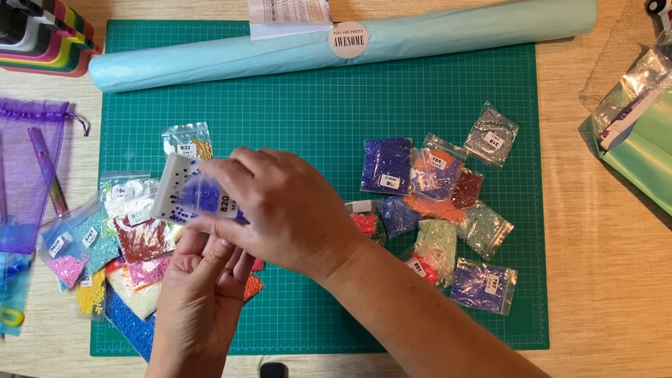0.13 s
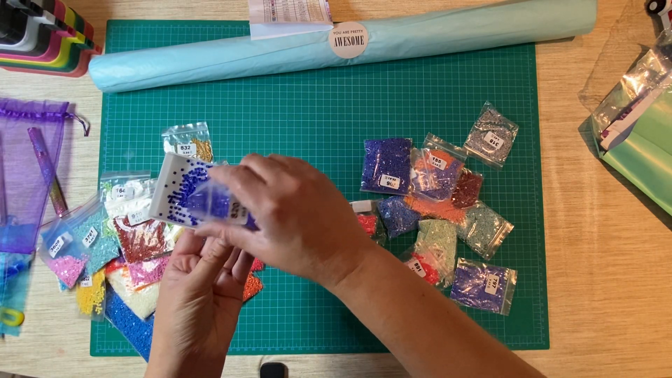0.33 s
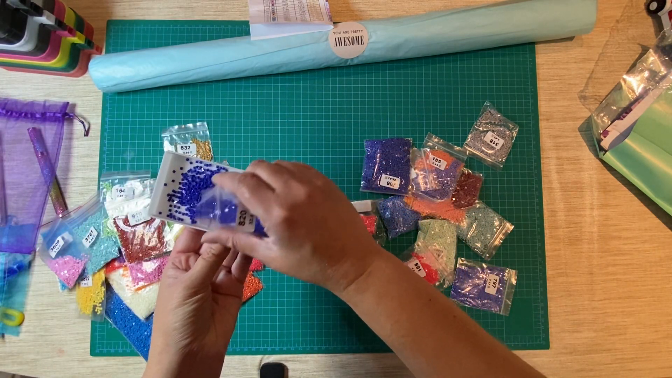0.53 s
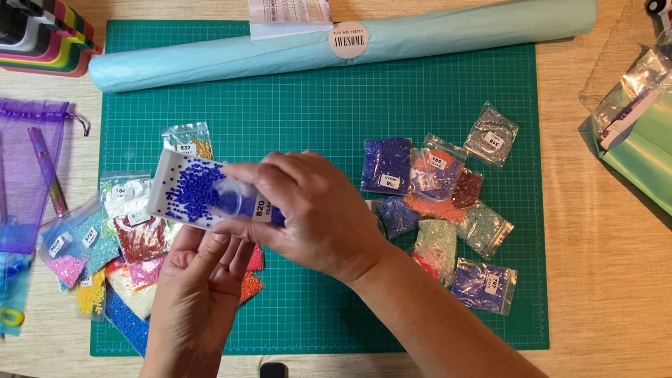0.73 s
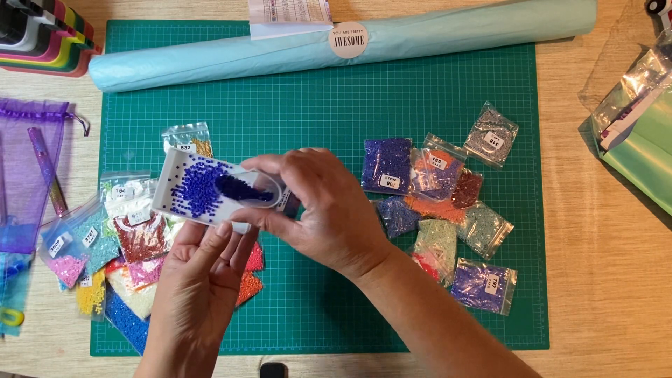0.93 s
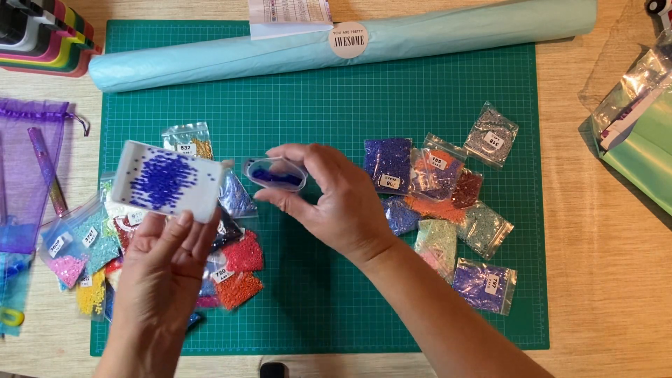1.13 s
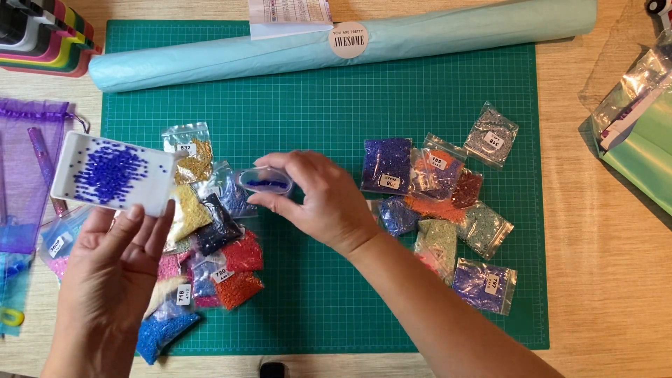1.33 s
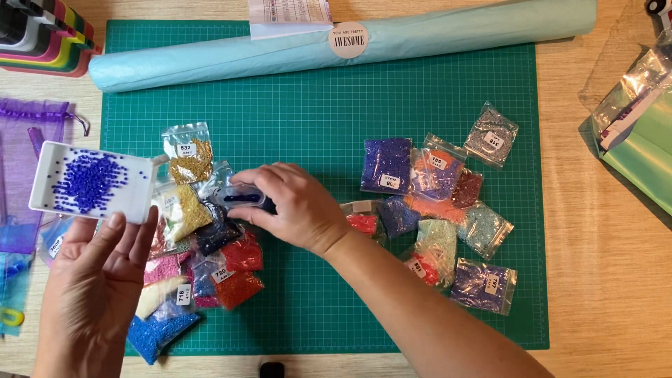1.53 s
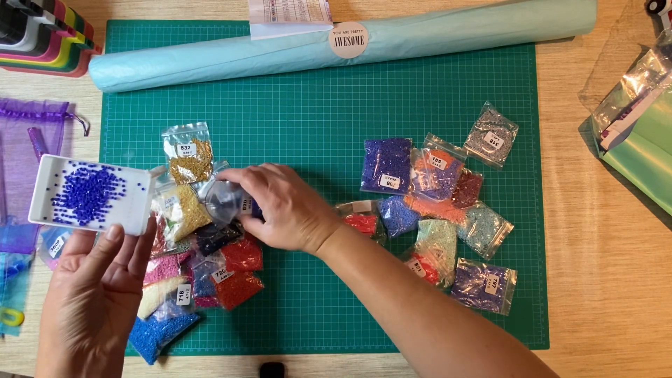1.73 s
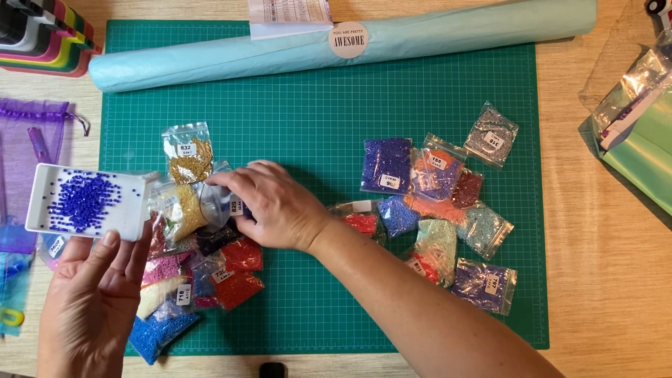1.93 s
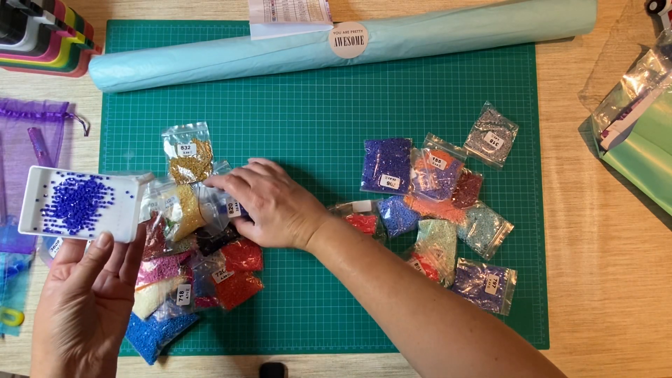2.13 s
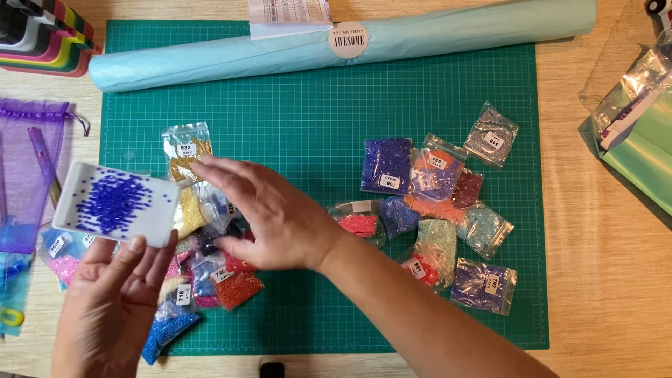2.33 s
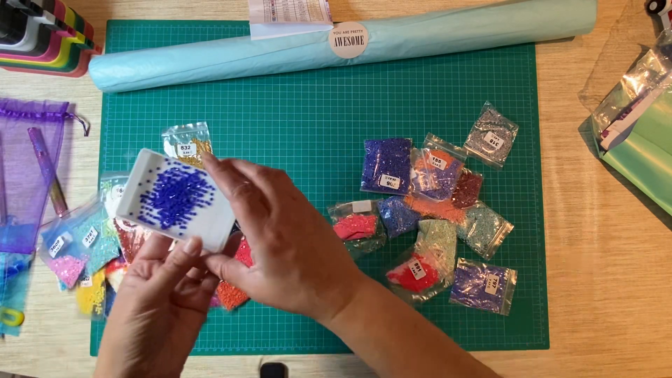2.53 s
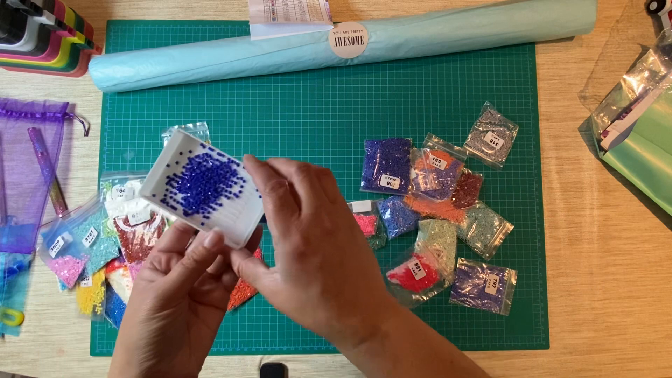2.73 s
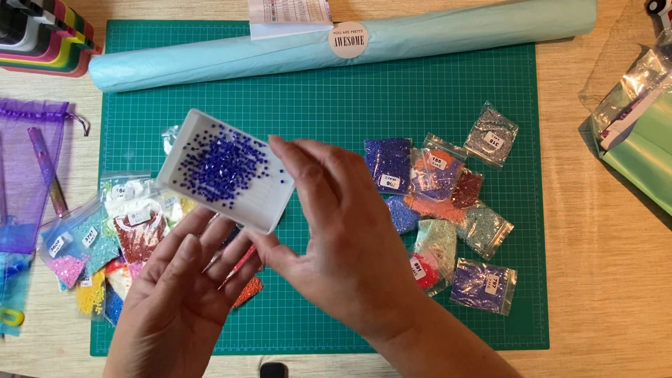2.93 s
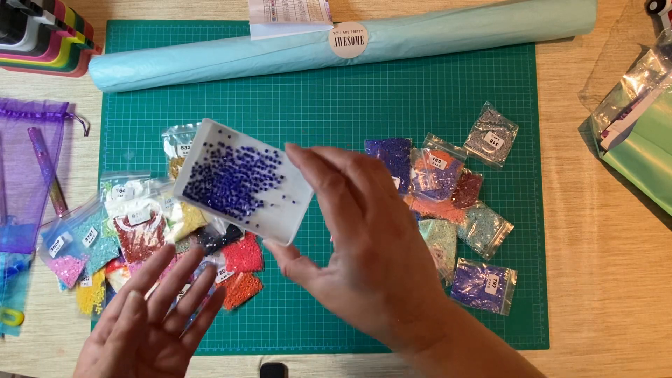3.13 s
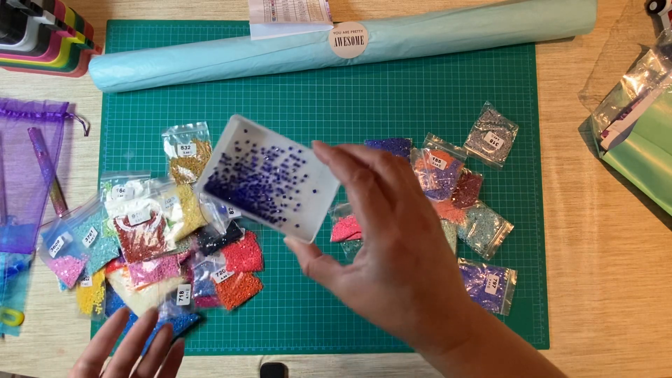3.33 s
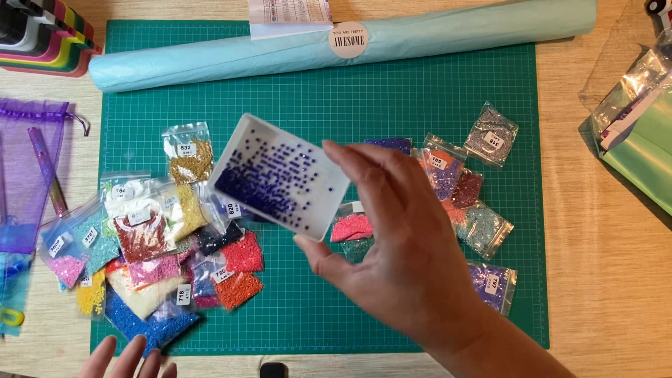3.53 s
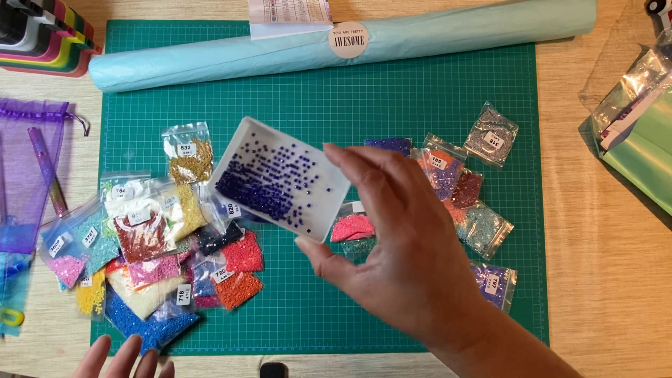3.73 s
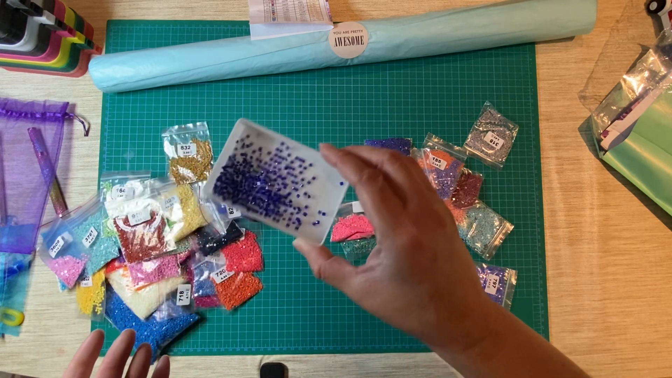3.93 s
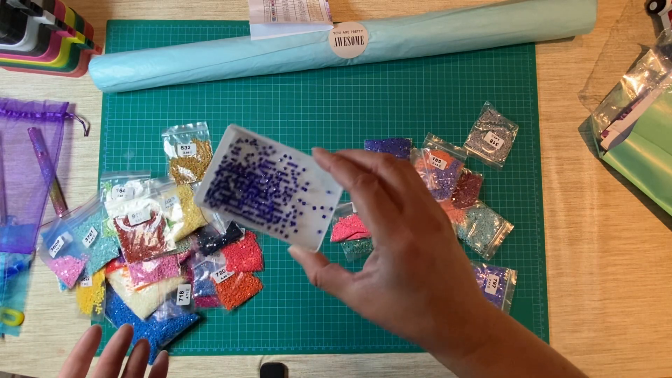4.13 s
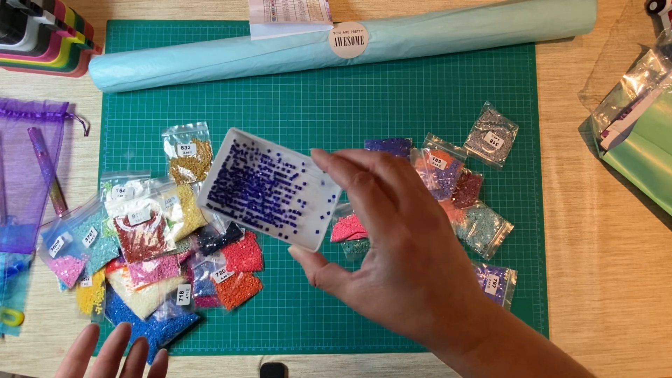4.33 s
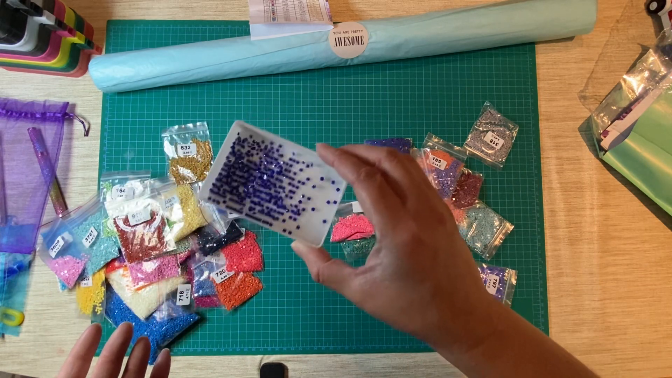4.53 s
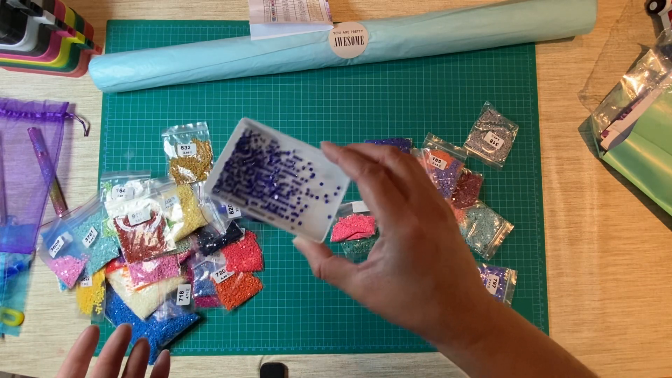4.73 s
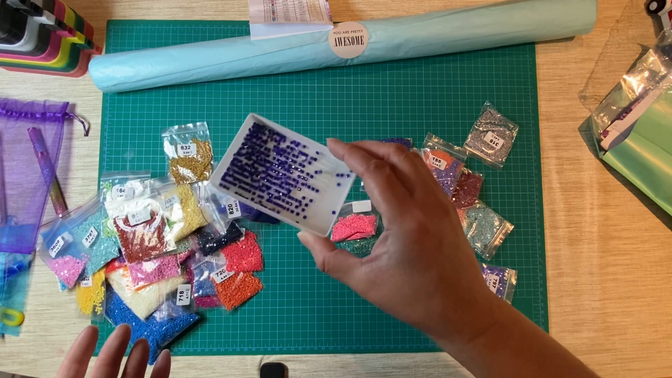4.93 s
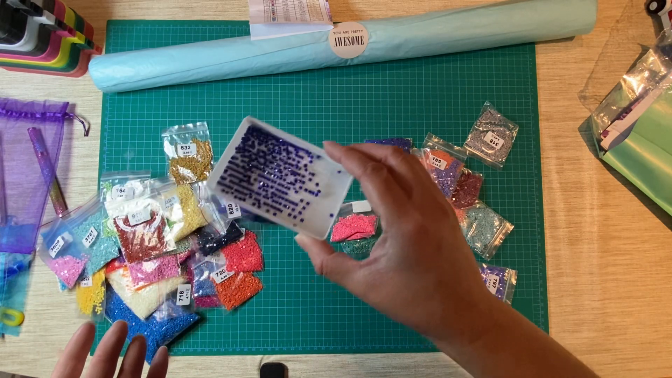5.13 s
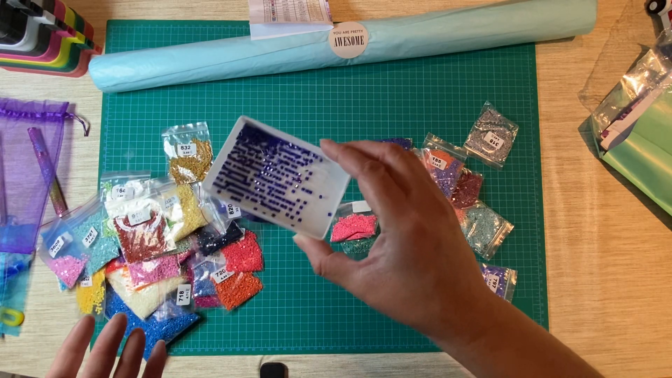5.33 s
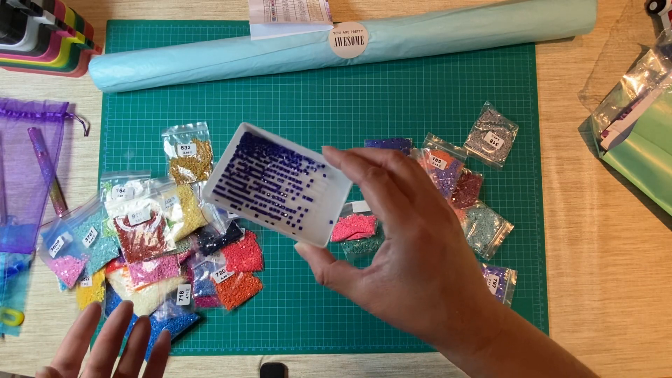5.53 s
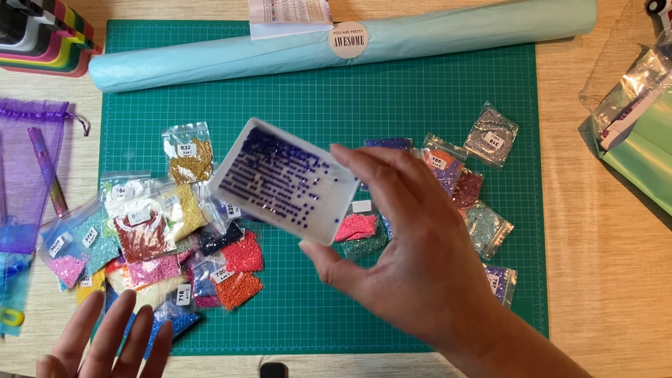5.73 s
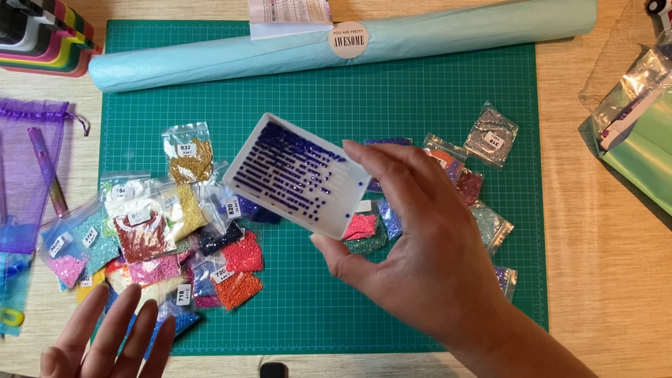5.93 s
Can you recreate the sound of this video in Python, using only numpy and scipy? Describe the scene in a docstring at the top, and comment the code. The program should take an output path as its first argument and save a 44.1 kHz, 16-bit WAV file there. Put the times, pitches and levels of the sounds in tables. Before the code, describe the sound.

Heard in close stereo above a table in a quiet room with low noise and a faint wavering hum. At 0 s a soft hollow knock rings out on the right as tiny resin beads already pour from a pot into a ridged plastic tray, a bright, clumpy patter. A surge comes at 0.4 s; scrapes, clicks and dry plastic taps cluster around 0.5 and 0.85-1.15 s while the trickle thins, leaving stray beads by 1.3 s. From 1.45 to 1.8 s the pot presses onto little plastic bags: crisp crinkles, rubbing and taps, faint until 2.1 s. Near quiet follows, with slight finger scuffs at 2.6-2.75 s. From 2.8 s the tray is jiggled: beads hiss and rattle in uneven jolts, strongly at 3.05 s, densest around 4-5.2 s with hard little ticks and plastic ringing, then thinner and softer until 6.1 s.

```python
"""A quiet room with low noise and a wavering hum; a hollow knock, then tiny resin beads are tipped from a pot
into a ridged plastic tray: clumped noise grains through resonances of pot and tray, with ringing modes.
The pot is set down on little plastic bags, which crinkle and rub in swells of grains; then fingers scuff the tray.
Last the tray is jiggled, so the beads hiss and rattle along its grooves, while the hum sinks for a moment.
Clicks are bursts of noise, bumps are decaying sines; all is heard in stereo from close above the table."""
import sys
import numpy as np
from scipy import signal
from scipy.fft import rfft, irfft, next_fast_len
from scipy.io import wavfile
from scipy.ndimage import uniform_filter1d

SR = 44100
rng = np.random.default_rng(int(sys.argv[2]) if len(sys.argv) > 2 else 0)


def generate_wav(sig):
    """Save sig (samples, or channels by samples) to the path in sys.argv[1] as 16-bit PCM at SR."""
    pcm = np.round(np.clip(np.atleast_2d(sig).T, -1, 1) * 32767).astype(np.int16)
    wavfile.write(sys.argv[1], SR, pcm)


N = 268260
SIZE = next_fast_len(N + SR // 2)   # leaves space for tails
HZ = np.maximum(np.arange(SIZE // 2 + 1) * SR / SIZE, 1)
TIME = np.arange(N) / SR

# Levels in the tables are relative: the layers trim them and the stereo image shades them.
# room noise colour: (frequency [Hz], level [dB per Hz])
ROOM = [(15, -44), (27, -16), (38, 1.5), (50, 12), (75, -1), (110, 4.5), (180, -0.5), (390, 0.5),
        (560, -10), (800, -12), (1200, -19.5), (3500, -30.5), (9000, -31.5), (15000, -52)]
# room hum: (frequency [Hz], rms level [dB])
HUM = [(47.5, -75.5), (66.1, -66), (199.2, -78), (506, -88), (597, -88)]
# the hum sinks for a moment: (time [s], level [dB])
HUM_LEVEL = [(0, 1), (3.2, 0), (3.33, -6), (4.1, -2.5), (4.5, -1), (6.09, 1.5)]
# stereo image by frequency: (frequency [Hz], left lead [rad], likeness [0-1], left minus right [dB])
STEREO = [(100, 0, .9, -.5), (350, -.1, .6, -2.6), (750, -.5, .35, -1.3), (1300, .1, .9, -2),
          (2000, .2, .93, -1), (2700, .9, .75, -3.3), (3400, .4, .78, -1.1), (4700, 1.4, .48, -4.2),
          (5800, 1.5, .6, -1), (6250, 1.9, .7, 0), (6650, 2.9, .97, 0), (7000, 3.1, .99, 0),
          (7650, 3.25, .99, 0), (8450, 4.4, .72, 0), (10000, 6.2, .97, 0), (11500, 6.5, .85, 0),
          (12350, 8, .8, 0), (12700, 9.3, .99, 0), (14200, 9.5, .995, 0), (15300, 11.8, .7, 0)]
# a hollow knock ringing out: (frequency [Hz], level [dB], t60 [s])
KNOCK = [(361, -38, 0.18), (440, -35, 0.092)]
# bumps of pot and fingers that set the plastic ringing: (time [s], level [dB], pitch [Hz], t60 [s])
BUMPS = [(0.167, -51, 119, 0.18), (.488, -35, 3330, 0.01), (0.54, -29.5, 880, 0.012),
         (0.5389, -33.5, 3420, 0.0092), (.8468, -37, 2260, 0.013), (0.848, -40, 339, 0.055),
         (.862, -43, 300, 0.041), (.867, -41, 1070, 0.018), (0.884, -37.5, 1110, 0.0079),
         (.909, -38, 910, 0.014), (0.941, -37, 1040, 0.017), (1.1335, -44, 950, .016),
         (1.14, -39, 900, 0.011), (1.446, -37.5, 5200, 0.0055), (1.6412, -39, 1400, .009),
         (1.6466, -37, 1230, 0.009), (1.6526, -39, 1300, .007), (1.657, -32.5, 1450, 0.013),
         (1.768, -44, 1750, 0.011), (1.802, -48.5, 506, 0.032), (2.813, -47, 58.7, 0.13),
         (2.816, -57, 2280, .04), (2.872, -42, 84.6, 0.052), (4.544, -49, 69.4, 0.44),
         (4.574, -50.5, 145, 0.15)]
# neighbours of a bump's main mode: (pitch [ratio], level [dB], t60 [share of the main t60])
BUMP_NEIGHBOURS = [(.68, -8.5, 0.44), (1.45, -9.5, 0.68)]
# clicks of pot, tray and snapping film: (time [s], low band [dB], middle band [dB], high band [dB])
TICKS = [(.3825, -51.5, -59, -53), (0.4881, -58, -44.5, -50), (.5402, -47, -60, -55),
         (0.6265, -58, -51.5, -52), (.711, -70, -68, -53), (0.787, -60.5, -59, -50),
         (0.837, -72, -50.5, -65), (.8467, -49, -45, -48.5), (.941, -51, -46.5, -45.5),
         (0.9633, -58, -56, -72), (1.0382, -48.5, -52, -50), (1.120, -55, -68, -42.5),
         (1.4445, -68, -54.5, -51), (1.503, -54.5, -57, -70), (1.513, -60, -52, -65),
         (1.526, -60, -53, -54), (1.5354, -50.5, -51, -52), (1.5507, -62, -51, -41), (1.561, -62, -53, -57),
         (1.574, -60, -63, -67), (1.669, -50.5, -48.5, -38), (1.683, -59, -62, -61),
         (1.7235, -60, -58, -60), (1.73, -57, -64, -66), (1.7394, -52, -56, -67), (1.766, -55, -61, -64),
         (1.8, -59, -56, -60), (1.852, -62, -70, -78), (1.9362, -70, -64.5, -67), (5.644, -66, -58, -43)]
# bands of a click: (low edge [Hz], high edge [Hz], t60 [s])
TICK_BANDS = [(500, 1800, .014), (1800, 6000, .006), (6000, 12500, .005)]
# faint after-ring of a click: (level [dB], t60 [s])
AFTER_RING = (-24, .05)
# modes that ring on when the pot clicks: (frequency [Hz], t60 [s], level [dB])
POT_RINGS = [(2110, 0.038, -7.5), (2530, .025, -5.5), (3300, 0.047, -7), (5550, 0.021, 6)]
# modes that ring on when one bead strikes the tray: (frequency [Hz], t60 [s], level [dB])
TRAY_RINGS = [(1306, 0.019, -14), (1997, 0.022, -9), (2133, 0.02, -7.5), (2275, 0.026, -4),
              (2740, 0.038, -11.5), (3246, 0.02, -5), (3663, 0.028, -11.5), (4860, 0.022, -8),
              (5700, 0.013, -4.5), (7300, .012, -31), (10400, 0.0062, -1)]
# single beads that land hard in the tray: (time [s], knock [dB], tick [dB])
LANDINGS = [(.041, -60, -39), (.123, -49, -48), (.132, -52, -43), (0.161, -55, -41), (.216, -53, -39.5),
            (.325, -56, -42), (.39, -56, -45), (.428, -50, -59), (0.497, -47, -53), (0.562, -52, -48),
            (.592, -56, -59), (0.604, -61, -52), (0.657, -63, -45), (.755, -55, -66), (.928, -57, -53),
            (1.045, -47, -50), (1.131, -47, -59), (1.25, -57, -71), (1.304, -63, -71), (1.322, -59, -69.5),
            (2.829, -53, -68), (2.862, -49, -45), (2.889, -58, -38), (3.055, -45.5, -35), (3.065, -44, -43),
            (3.203, -46, -53), (3.406, -41, -47), (3.514, -49, -47), (3.541, -49, -47), (3.553, -50, -47),
            (3.586, -46, -46), (3.626, -47, -52), (3.761, -55, -47), (3.801, -48, -49), (3.892, -43, -45),
            (3.937, -47, -51), (4.074, -44.5, -45), (4.165, -43, -38), (4.233, -43, -37), (4.284, -46, -37),
            (4.296, -56, -40), (4.32, -41, -47), (4.35, -42, -42), (4.463, -45, -48), (4.5, -48, -36),
            (4.662, -39, -44), (4.752, -48, -40), (4.8, -39.5, -45), (4.864, -53, -35), (4.943, -44, -46),
            (5.006, -41.5, -42), (5.043, -45, -40), (5.069, -46, -37), (5.124, -46, -36), (5.133, -52, -39),
            (5.156, -48, -46), (5.16, -41, -49), (5.192, -46, -39), (5.292, -45, -48), (5.449, -47, -50),
            (5.474, -48, -42), (5.727, -56, -40), (5.774, -60, -42), (5.785, -49, -46), (5.814, -53, -38),
            (5.87, -63, -41), (5.946, -55, -41), (5.993, -59, -43)]
# fingers sliding onto the tray: (peak time [s], length [s], level [dB])
SCUFF = [(2.585, 0.027, -62.5), (2.64, 0.057, -63), (2.762, 0.023, -65.5)]
# the pot scrapes the tray's rim: (peak time [s], length [s], level [dB])
SCRAPES = [(.36, 0.11, -53), (.54, 0.044, -48), (.67, 0.1, -59), (.755, 0.014, -51.5), (.865, 0.042, -45.5),
           (.945, 0.064, -45), (1.05, 0.044, -48.5), (1.135, 0.082, -49), (1.26, 0.11, -55.5)]
# the pot presses into the bags: (peak time [s], length [s], crinkle [dB], rub [dB])
PRESSES = [(1.455, 0.017, -58.5, -68), (1.515, 0.032, -55, -55.5), (1.562, 0.04, -54, -53),
           (1.65, 0.031, -53.5, -47), (1.679, 0.017, -49.5, -56), (1.735, 0.055, -56, -54.5),
           (1.795, 0.07, -63, -54), (1.9, 0.069, -73, -64), (2.03, 0.13, -75, -65.5),
           (2.125, 0.034, -67.5, -62.5)]
# jerks of the pot stir the beads inside and spill a few: (peak time [s], length [s], stirred [dB], spilled [dB])
JERKS = [(.405, 0.055, -54.5, -45.5), (.58, 0.15, -69, -70), (.865, 0.072, -57.5, -55),
         (1.035, 0.064, -54, -45.5), (1.135, .11, -52.5, -54.5), (1.3, 0.063, -68, -68)]
# steady trickle of beads out of the pot: (time [s], level [dB])
POUR = [(0, -38), (.08, -43.5), (.22, -43), (.33, -47), (.64, -49.5), (.76, -57), (.98, -57), (1.3, -73),
        (1.42, -90)]
# steady run of beads down the tilted tray: (time [s], level [dB])
SHAKE = [(2.79, -87), (2.817, -56), (2.83, -50), (3.5, -46.5), (3.82, -44.5), (4.4, -43.5), (5.22, -46.5),
         (5.41, -50.5), (5.97, -52.5), (6.08, -59)]
# jolts of the hand that throw the beads along the tray: (peak time [s], length [s], level [dB])
JOLTS = [(2.88, .06, -48.5), (2.95, 0.047, -54), (3.015, 0.056, -45), (3.056, 0.039, -40),
         (3.145, 0.07, -46), (3.208, 0.052, -42.5), (3.4, 0.063, -46.5), (3.568, 0.044, -47),
         (3.765, 0.074, -47), (3.96, 0.038, -47.5), (4.285, 0.088, -48.5), (4.475, 0.058, -48),
         (4.635, 0.067, -48), (4.768, 0.031, -44), (4.82, .035, -46.5), (4.95, 0.017, -56),
         (4.992, 0.066, -48.5), (5.135, 0.064, -46.5), (5.29, 0.05, -50), (5.455, 0.039, -49),
         (5.63, 0.049, -48), (5.725, 0.041, -52), (5.785, 0.059, -50.5), (5.88, 0.017, -53),
         (5.945, 0.059, -54.5)]
# colour of rubbing on rim and bags: (frequency [Hz], level [dB per Hz])
RUB_COLOUR = [(150, -7), (350, -1), (700, -2), (1050, 0), (1500, -7), (2400, -6), (4000, -9), (12000, -37)]
# colour of crinkling film: (frequency [Hz], level [dB per Hz])
CRINKLE_COLOUR = [(300, -18), (1500, -4), (2600, 0), (3600, -5), (5600, 1), (8000, -2), (10500, -7),
                  (15500, -12)]
# colour of beads against the pot's wall: (frequency [Hz], level [dB per Hz])
SLIDE_COLOUR = [(300, -7), (1200, -5), (3500, 0), (7000, -1.5), (15500, -41)]
# colour of pouring beads and of sliding skin: (frequency [Hz], level [dB per Hz])
POT_COLOUR = [(150, 4), (400, -4.5), (900, -3.5), (1400, -3), (2000, 1.5), (2800, -4.5), (3400, -0.5),
              (4200, -2), (7000, 4), (10000, -1.5), (12500, 2.5), (15500, -2.5)]
# colour of beads in the tray: (frequency [Hz], level [dB per Hz])
TRAY_COLOUR = [(150, -20), (400, -12), (900, -13), (1120, -12.5), (1350, -7), (1850, -6), (2500, -4.5),
               (3000, -3), (4000, -2), (6000, -.5), (8000, -2), (11000, -1.5), (13400, 0), (15500, -3)]
# resonances of the pot: (frequency [Hz], width [Hz], lift [dB])
POT_MODES = [(2005, 330, 11), (2430, 170, 9.5), (3120, 630, 6), (5440, 400, 0.5)]
# resonances of the pot's lip as beads roll over it: (frequency [Hz], width [Hz], lift [dB])
LIP_MODES = [(3600, 200, 2), (5660, 260, 3), (7350, 450, 1), (9700, 630, 7.5)]
# resonances of the undamped tray: (frequency [Hz], width [Hz], lift [dB])
TRAY_MODES = [(1310, 160, 4), (1680, 120, 2), (2070, 170, 7), (2260, 190, 9), (2700, 150, 5.5),
              (3270, 220, 6.5), (4680, 200, 2), (4960, 160, 4.5), (5750, 250, 2), (7330, 450, 8),
              (9150, 800, 4), (10250, 450, 7.5), (12000, 600, 2)]

ROOM_NOISE_DB = -64.5
CEILING_S, ROOM_T60_S = 0.013, 0.072
CUTOFF_HZ = 15700
# every movement swells and dies away: share of its length spent rising, and exponent of its fall
RISE_SHARE, FALL_POWER = 0.45, 2


def from_db(db):
    """Decibels to gain."""
    return 10 ** (np.asarray(db) / 20)


def rms_one(x):
    """Scale to rms 1."""
    return x / np.sqrt(np.mean(x ** 2) + 1e-20)


def gains(rows):
    """The dB columns of a curve as gains in time, silent outside it."""
    s, *columns = np.transpose(rows)
    return [from_db(np.interp(TIME, s, c, left=-200, right=-200)) for c in columns]


def swells(moves):
    """Gains in time, one per dB column: each movement is 3 dB down at the ends of its length; powers add."""
    share, power = RISE_SHARE, 0
    coarse = TIME[::20]
    for s, length, *levels_db in moves:
        age = (coarse - s) / length
        rising = (age / share) ** 2
        falling = (np.abs(age) / (1 - share)) ** FALL_POWER
        away = np.where(age < 0, rising, falling)
        power = power + from_db(levels_db)[:, None] ** 2 * .5 ** np.minimum(away, 60)
    return [np.sqrt(np.interp(TIME, coarse, p)) for p in power]


def over_hz(rows):
    """The columns of a table, joined on a log-frequency axis."""
    hz, *columns = np.transpose(rows)
    return [np.interp(np.log(HZ), np.log(hz), c) for c in columns]


def filtered(x, response):
    """Pass x through a frequency response."""
    return irfft(rfft(x, SIZE) * response, SIZE)[..., :N]


def body(colour, modes=()):
    """Minimum-phase response of unit power: a broad colour with resonances on top."""
    db = over_hz(colour)[0]
    db = db + sum(lift / (1 + (2 * (HZ - hz) / width) ** 2) for hz, width, lift in modes)
    cepstrum = irfft(np.log(rms_one(from_db(db))), SIZE)
    # folding the cepstrum forward makes the response causal
    cepstrum[1:SIZE // 2] *= 2
    cepstrum[SIZE // 2 + 1:] = 0
    return np.exp(rfft(cepstrum, SIZE))


def drift(corner_hz):
    """Slow random wander of rms 1: noise low-passed at corner_hz."""
    return rms_one(filtered(rng.standard_normal(N), 1 / (1 + (HZ / corner_hz) ** 2)))


def contacts(per_s, spread_db, clump_db, clump_hz, contact_s):
    """Tiny clumped impacts of uneven size, as decaying noise grains with random place: rows (centre, offset)."""
    sizes = from_db(spread_db * np.minimum(rng.exponential(1, N), 4) + clump_db * drift(clump_hz))
    energy = sizes ** 2 * (rng.random(N) < per_s / SR) + 1e-9
    energy = signal.lfilter([1], [1, -np.exp(-2 / (contact_s * SR))], energy)
    # levelled over 45 ms, so that the gain curves set the loudness
    steady = energy / (uniform_filter1d(energy, size=2001) + 1e-3)
    return np.sqrt(steady) * rng.standard_normal((2, N))


def tail(start_s, t60):
    """Response of scattered reflections that die away; unit energy."""
    decay = rng.standard_normal(N) * from_db(-60 * np.minimum(TIME / t60, 4)) * (TIME > start_s)
    return rfft(decay / np.sqrt(np.sum(decay ** 2)), SIZE)


def room(x, ceiling_db=-17, tail_db=-14, dull_hz=7000):
    """One echo off the ceiling and a short, duller tail."""
    echo = from_db(ceiling_db) * np.exp(-2j * np.pi * HZ * CEILING_S)
    tails = np.array([tail(0.0043, ROOM_T60_S) for row in x])
    return filtered(x, 1 + echo + from_db(tail_db) * tails / (1 + 1j * HZ / dull_hz))


def stereo_image(x):
    """Left and right differ in phase, level and likeness by frequency, following the stereo table."""
    lead, alike, balance_db = over_hz(STEREO)
    centre, offset = x
    sides = np.array([[1], [-1]])   # left, right
    side = np.exp(.5j * sides * lead) * from_db(sides * balance_db / 2)
    shared = filtered(centre, side * np.sqrt((1 + alike) / 2))
    return shared + filtered(offset, side * sides * np.sqrt((1 - alike) / 2))


def background(waver_db=-0.5, waver_rad=0.72):
    """Low room noise, and a hum of sines wavering in level and phase, the same left and right."""
    hum = 0
    for hz, db in HUM:
        level = from_db(db + waver_db * drift(2.4)) * np.sqrt(2)   # rms to peak
        hum = hum + level * np.sin(2 * np.pi * hz * TIME + waver_rad * drift(4.0))
    noise = from_db(ROOM_NOISE_DB) * filtered(rng.standard_normal((2, N)), body(ROOM))
    return hum * gains(HUM_LEVEL)[0] + stereo_image(noise)


def ring(s, db, hz, t60, rise_cycles=0.34):
    """A mode struck by a soft contact, so that it builds up within about a cycle."""
    out, at = np.zeros(N), int(s * SR)
    age = TIME[:min(N - at, int(2 * t60 * SR))]
    rise = 1 - np.exp(-age * hz / rise_cycles)
    out[at:at + len(age)] = rise * from_db(db - 60 * age / t60) * np.sin(2 * np.pi * hz * age)
    return out


def bump(s, db, hz, t60):
    """A bump rings its main mode and two neighbours that die sooner, which dries the tone to a tap."""
    neighbours = sum(ring(s, db + rel_db, hz * ratio, t60 * share) for ratio, rel_db, share in BUMP_NEIGHBOURS)
    return ring(s, db, hz, t60) + neighbours


def handling(knock_pan_db=-4.0):
    """A hollow knock to the right at the very start, and the bumps of pot and fingers, as decaying sines."""
    knock = sum(ring(0, db, hz, t60) for hz, db, t60 in KNOCK)
    panned = knock * from_db(knock_pan_db * np.array([[1], [-1]]))
    return panned + sum(bump(*row) for row in BUMPS)


def ticks():
    """Each click is a very short crack of noise whose lows ring longest, with a faint after-ring."""
    out, t = np.zeros((2, N)), TIME[:SR // 20]
    after_db, after_t60 = AFTER_RING
    for k, (low, high, t60) in enumerate(TICK_BANDS):
        band = signal.butter(2, [low, high], "band", fs=SR, output="sos")
        decay = from_db(-60 * t / t60) + from_db(after_db - 60 * t / after_t60)
        cracks = signal.sosfilt(band, rng.standard_normal((len(TICKS), 2, len(t))) * decay)
        cracks /= np.sqrt(np.sum(cracks ** 2, axis=-1, keepdims=True) / (SR // 200))   # rms 1 over 5 ms
        for (s, *bands_db), crack in zip(TICKS, cracks):
            at = int(s * SR)
            out[:, at:at + len(t)] += from_db(bands_db[k]) * crack
    return out


def struck(hits, modes, vary_db=1.5, detune=0.025):
    """Each hit (s, dB) rings the modes in a new mix, slightly detuned by where it lands and the load of beads."""
    out, t = np.zeros((2, N + SR)), TIME[:SR // 20]
    hz, t60, db = np.transpose(modes)[..., None]
    decay = from_db(db - 60 * t / t60)
    for s, level_db in hits:
        pitch, size, centre, offset = rng.standard_normal((4, len(modes), 1))
        tones = np.sin(2 * np.pi * hz * (1 + detune * pitch) * t)
        rings = from_db(level_db + vary_db * size) * decay * tones
        at = int(s * SR)
        out[:, at:at + len(t)] += np.sum(np.sign([centre, offset]) * rings, axis=1)
    return out[:, :N]


def after_rings(tray_db=-2.5, pot_db=-6.5):
    """The tray's modes ring on after each hard landing, the pot's after each click."""
    tray = struck([(s, knock_db + tray_db) for s, knock_db, _ in LANDINGS], TRAY_RINGS)
    return tray + struck([(s, middle_db + pot_db) for s, _, middle_db, _ in TICKS], POT_RINGS)


def rubbing(pot_db=-8.0):
    """Grains of stick and slip as the pot rubs on rim and bags; skin slides onto the tray."""
    _, rub = swells(PRESSES)
    slips = contacts(800, spread_db=-1.0, clump_db=0.7, clump_hz=21, contact_s=0.00052)
    pot = filtered(slips * np.hypot(swells(SCRAPES)[0], rub), body(RUB_COLOUR))
    skin = contacts(700, spread_db=1.0, clump_db=1.0, clump_hz=40, contact_s=0.0026)
    fingers = filtered(skin * swells(SCUFF)[0], body(POT_COLOUR))
    return from_db(pot_db) * pot + fingers


def bags(level_db=-1.0):
    """Thin film crinkles under the pot in a flurry of tiny snaps."""
    crinkle, _ = swells(PRESSES)
    snaps = contacts(1000, spread_db=1.5, clump_db=-0.5, clump_hz=89, contact_s=0.0031)
    return from_db(level_db) * filtered(snaps * crinkle, body(CRINKLE_COLOUR))


def sliding(per_s=1300):
    """The beads still in the pot rattle against its resonant wall."""
    stirred, _ = swells(JERKS)
    hits = contacts(per_s, spread_db=0.5, clump_db=-0.5, clump_hz=36, contact_s=0.0019)
    return filtered(hits * stirred, body(SLIDE_COLOUR, POT_MODES))


def landings(level_db=-2.0, t60=0.013, split_hz=4200):
    """A single bead lands hard, as a burst of noise: a knock of the tray below, a bright tick above."""
    out, t = np.zeros((2, 2, N)), TIME[:SR // 40]   # knock and tick, each (centre, offset)
    for s, *levels_db in LANDINGS:
        tick = rng.standard_normal((2, len(t))) * from_db(-60 * t / t60)
        tick /= np.sqrt(np.sum(tick ** 2, axis=-1, keepdims=True) / (SR // 500))   # rms 1 over 2 ms
        at = int(s * SR)
        out[..., at:at + len(t)] += from_db(levels_db)[:, None, None] * tick
    step, tray = 1j * HZ / split_hz, body(TRAY_COLOUR, TRAY_MODES)
    # second-order low-pass and high-pass halves of the tray, each of unit power
    parts = [tray * top / (1 + np.sqrt(2) * step + step ** 2) for top in (1, -step ** 2)]
    parts = [part / np.sqrt(np.mean(np.abs(part) ** 2)) for part in parts]
    return from_db(level_db) * sum(filtered(x, part) for x, part in zip(out, parts))


def rattle(flow, per_s, split_hz=4000, floor_growth=0.17, hop_db=-13.0):
    """Beads knock on the tray's floor (low, growing faster with vigour) and on each other (bright)."""
    vigour = flow / np.percentile(flow, 85)
    knocks = contacts(.3 * per_s * vigour ** 0.62, spread_db=0.5, clump_db=0.5, clump_hz=20, contact_s=0.00072)
    chatter = contacts(per_s * vigour ** 0.96, spread_db=-1.5, clump_db=1.5, clump_hz=12, contact_s=0.0023)
    # single beads hop a ridge and land with a harder tick
    hops = from_db(hop_db) * contacts(130, spread_db=2.0, clump_db=4.5, clump_hz=29, contact_s=0.0017)
    low, high = (signal.butter(2, split_hz, kind, fs=SR, output="sos") for kind in ("low", "high"))
    floor = signal.sosfilt(low, knocks + hops) * vigour ** floor_growth
    bright = signal.sosfilt(high, chatter - 1.38 * hops)
    return flow * (floor + bright)


def ringing(flow, per_s, grip_db=1.0):
    """Beads strike the tray at random spots, ringing its modes in a new mix; the grip sways each mode's level."""
    strikes = (rng.random(N) < per_s / SR) * from_db(rng.uniform(-8, 0, N))
    spectrum = 0
    for hz, t60, db in TRAY_RINGS:
        hits = rms_one(strikes * rng.standard_normal((2, N)) * from_db(grip_db * drift(3.1)))
        # a resonator whose sharpness follows from its t60
        mode = 1 / (1 + 1j * np.pi * hz * t60 / np.log(1000) * (HZ / hz - hz / HZ))
        mode = mode / np.sqrt(np.mean(np.abs(mode) ** 2))
        spectrum = spectrum + from_db(db) * rfft(hits * flow, SIZE) * mode
    return irfft(spectrum, SIZE)[..., :N]


def damped_tray(ring_share):
    """The tray's resonances with only a share of their lift left."""
    return [(hz, width, ring_share * lift) for hz, width, lift in TRAY_MODES]


def pouring(level_db=-6.5, per_s=2200, ring_share=0.16, rings_db=-21, strikes_per_s=220):
    """Beads drop over the pot's lip and rattle in the tray, which the palm damps."""
    _, spilled = swells(JERKS)
    flow = np.hypot(gains(POUR)[0], spilled)
    beads = filtered(rattle(flow, per_s), body(POT_COLOUR, damped_tray(ring_share) + LIP_MODES))
    return from_db(level_db) * beads + from_db(rings_db) * ringing(flow, strikes_per_s)


def shaking(level_db=1.34, per_s=7000, ring_share=0.7, rings_db=-12.0, strikes_per_s=260):
    """Beads run along the ridges; each jolt brings more and louder contacts."""
    flow = np.hypot(gains(SHAKE)[0], swells(JOLTS)[0])
    beads = filtered(rattle(flow, per_s), body(TRAY_COLOUR, damped_tray(ring_share)))
    return from_db(level_db) * beads + from_db(rings_db) * ringing(flow, strikes_per_s)


def scene():
    """Everything on the table, in the room."""
    contact_sounds = ticks() + after_rings() + rubbing() + bags()
    bead_sounds = sliding() + landings() + pouring() + shaking()
    return background() + handling() + stereo_image(room(contact_sounds + bead_sounds))


def record(dry):
    """The top is cut steeply by an elliptic low-pass."""
    return signal.sosfilt(signal.ellip(10, .1, 80, CUTOFF_HZ, fs=SR, output="sos"), dry)


dry = scene()
out = record(dry)
generate_wav(out)
```